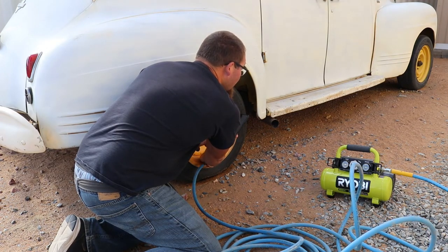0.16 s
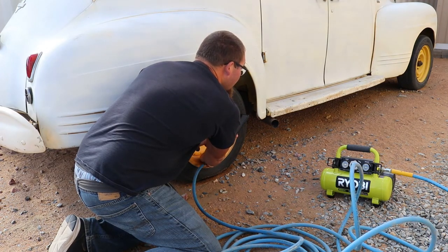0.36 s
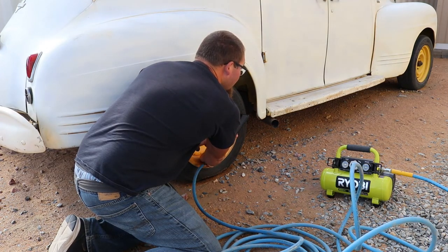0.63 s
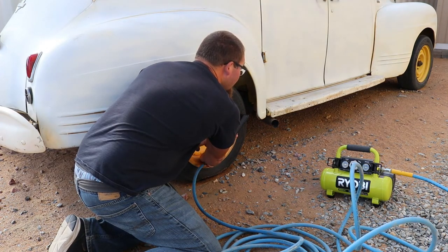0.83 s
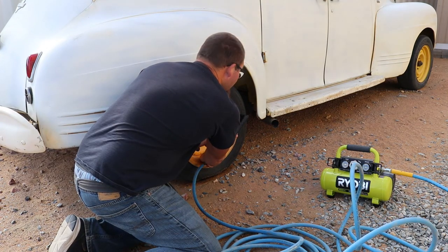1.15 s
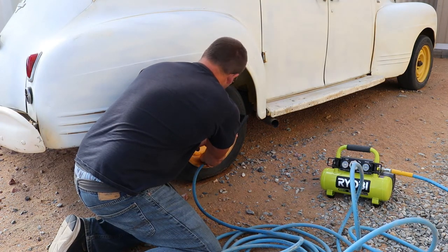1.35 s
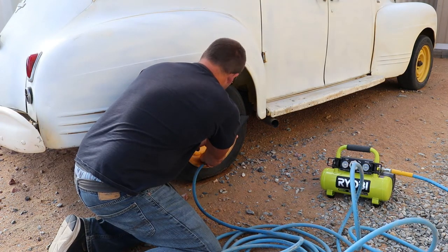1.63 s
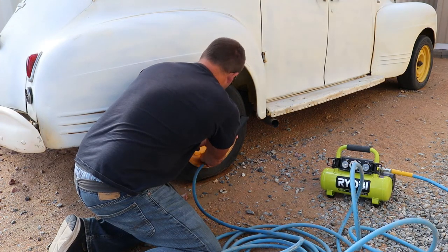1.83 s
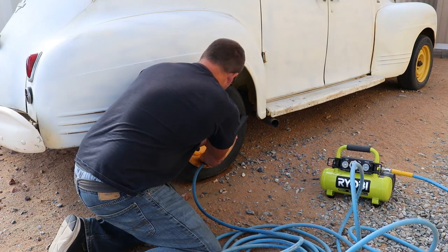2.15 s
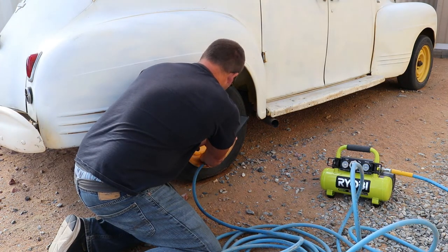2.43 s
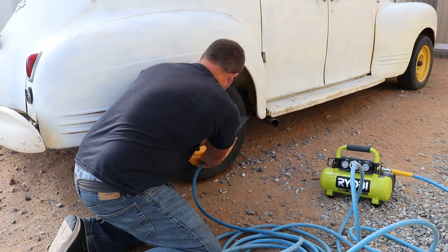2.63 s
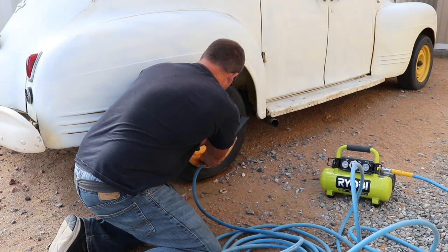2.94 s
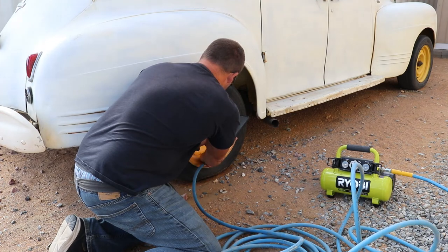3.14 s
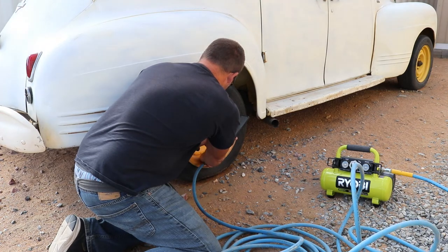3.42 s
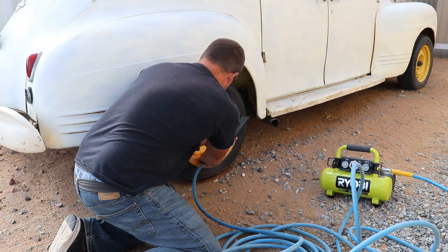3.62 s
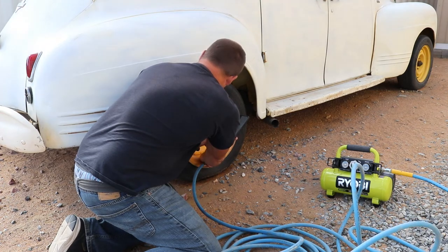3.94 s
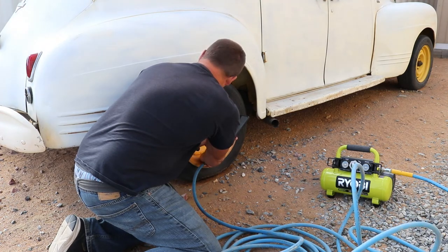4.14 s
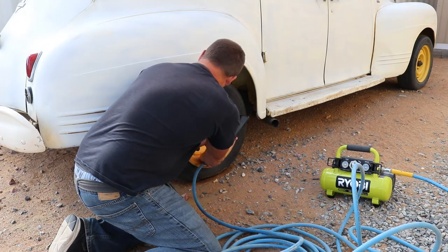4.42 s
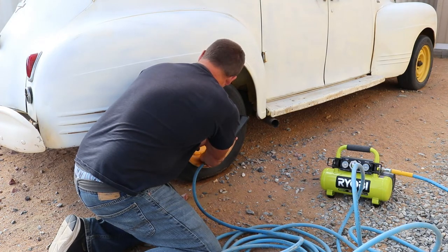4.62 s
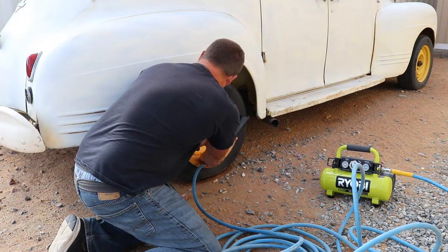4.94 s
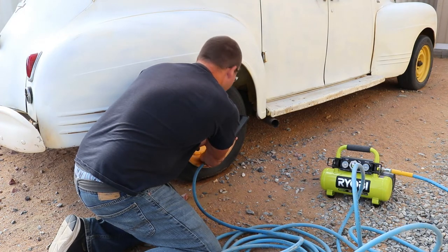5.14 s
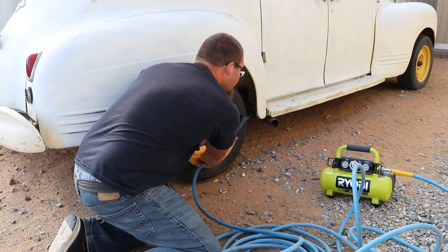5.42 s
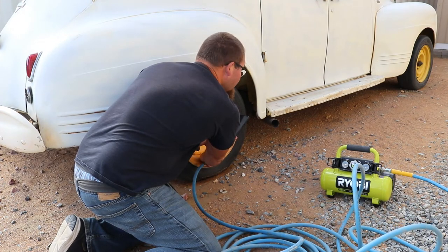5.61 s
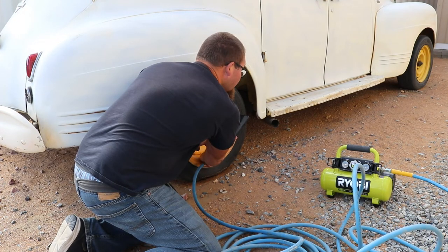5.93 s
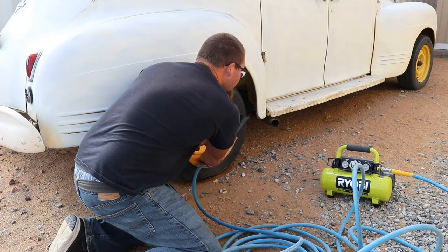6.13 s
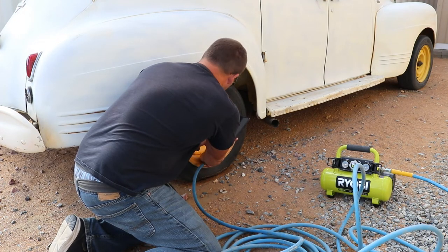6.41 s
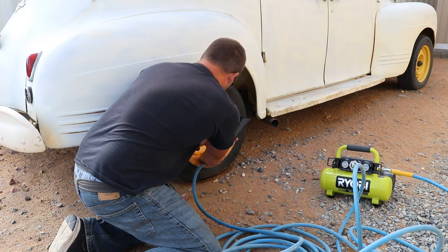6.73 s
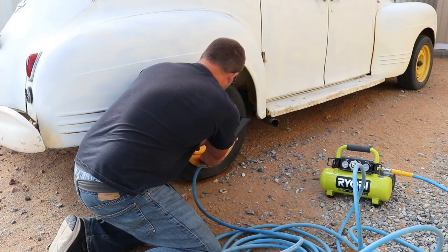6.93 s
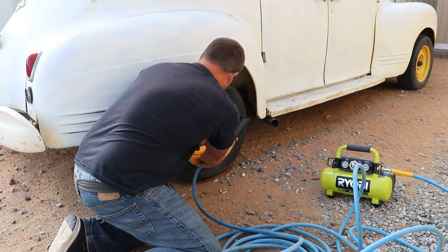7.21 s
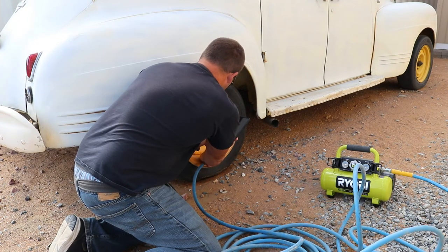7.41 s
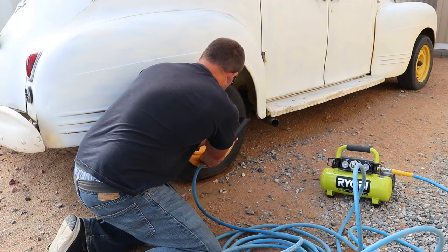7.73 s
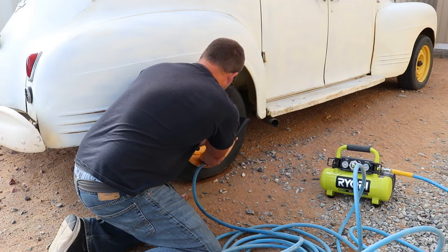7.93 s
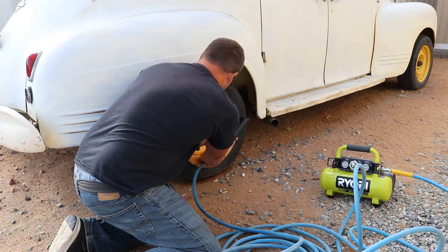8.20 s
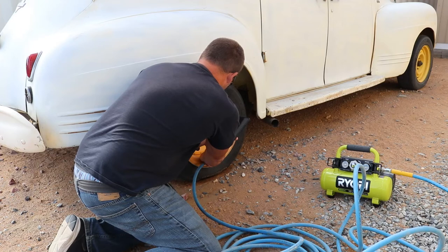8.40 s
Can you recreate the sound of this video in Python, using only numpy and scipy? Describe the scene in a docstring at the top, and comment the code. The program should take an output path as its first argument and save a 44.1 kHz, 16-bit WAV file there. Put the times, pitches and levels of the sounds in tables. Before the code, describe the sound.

A small air compressor runs steadily outdoors, with a buzzing motor drone, fine metallic rattle and soft air hiss.

```python
"""Outdoors on gravel, a couple of metres from the microphone, a small battery piston compressor pumps steadily.
Every shaft turn repeats one stroke: a gulp that rings housing and head, valve knocks on the metal,
a fine clatter. Behind the piston, ball bearings beat against the turn and air hisses through the same
body. A faint mains hum lies underneath."""
import sys
import numpy as np
from scipy import signal
from scipy.fft import rfft, irfft, next_fast_len
from scipy.io import wavfile
from scipy.ndimage import uniform_filter1d, map_coordinates

SR = 44100
rng = np.random.default_rng(int(sys.argv[2]) if len(sys.argv) > 2 else 0)


def master_out(mix):
    """Clip the mix to full scale and print it as 16-bit PCM to the path in sys.argv[1]."""
    frames = np.transpose(np.atleast_2d(mix))
    ceiling = np.clip(frames, -1, 1)
    pcm = np.round(ceiling * 32767).astype(np.int16)
    wavfile.write(sys.argv[1], SR, pcm)


N = 377937

# Shaft speed, creeping up: time_s, speed_hz
SHAFT_SPEED = [(0, 82.455), (2, 82.5), (4, 82.565), (6, 82.655), (8.57, 82.765)]
# Overtones 1, 2, 3 .. of the turn, sliding as the back pressure changes: start_db, end_db
GULP_LEVELS = [(-42.5, -43.0), (-40.0, -40.5), (-47.0, -46.5), (-27.0, -25.0), (-18.0, -16.5),
               (-23.0, -26.0), (-29.5, -30.5), (-25.0, -24.0), (-33.0, -28.5), (-37.0, -33.5),
               (-33.0, -34.0), (-40.0, -43.5), (-45.5, -42.5), (-29.0, -33.0), (-32.5, -36.0),
               (-44.5, -41.5)]
# Mode clusters delay the gulp, a notch (count -1) turns it over: centre_hz, width_hz, mode_count
HOUSING_MODES = [(486, 177, 5), (823, 20, -1), (1143, 232, 5)]
# Buzz above the gulp, per overtone: pitch_hz, level_db
BUZZ_SPECTRUM = [(1400, -54), (1800, -52), (2400, -56.5), (3100, -55.5), (3750, -68.5), (5100, -61.5),
                 (6300, -66), (6700, -77.5), (7250, -77), (7800, -66), (8500, -85), (9400, -74),
                 (10100, -84.5)]
# Overtones that land on a sharp mode of the metal and sing out: overtone, start_db, end_db
SINGING_OVERTONES = [(20, -46, -48.5), (23, -46, -55.5), (24, -46.5, -50), (27, -55.5, -49),
                     (28, -50.5, -41), (31, -49.5, -47.5), (35, -47.5, -53), (36, -46.5, -49),
                     (38, -49.5, -52.5), (51, -57.5, -59.5), (59, -65.5, -55.5), (62, -52, -55.5),
                     (77, -58, -52), (78, -59, -58), (95, -64, -62.5), (115, -66, -68.5)]
# Valve knocks, levels before trim: pitch_hz, width_hz, angle_turns, repeating_db, scattered_db
VALVE_KNOCKS = [(1560, 150, .4, -50, -66), (1950, 200, .28, -50, -64), (2300, 130, .12, -46, -62),
                (2620, 200, .95, -54, -68), (3000, 120, .68, -52, -66), (5120, 60, .2, -63, -62),
                (6370, 120, .3, -53, -60), (7350, 60, .88, -68, -78), (7700, 120, .9, -70, -75),
                (7830, 300, .25, -59, -66), (9510, 120, .23, -62, -70)]
# Settled clatter, per overtone: pitch_hz, level_db
CLATTER_SPECTRUM = [(300, -86.5), (900, -70), (1300, -59), (3000, -60), (3500, -76), (4600, -72.5),
                    (6300, -72.5), (6600, -83.5), (8000, -79.5), (10000, -90), (10300, -92), (12000, -93),
                    (15500, -102)]
# Bearing cages, levels before trim: turns_per_shaft_turn, level_db
BEARING_CAGES = [(.383, -57), (.414, -57), (.4375, -57)]
# Resonances of the bearing races: centre_hz, width_hz, relative_db
RACE_MODES = [(1070, 100, 1), (1175, 100, 2), (1447, 97, 7.5), (2004, 150, 2.5), (2277, 260, 0),
              (2550, 220, -8.5)]
# Air hiss before the body colours it: frequency_hz, density_db (per Hz)
AIR_SPECTRUM = [(30, -93), (80, -85), (270, -83.5), (330, -71.5), (800, -72.5), (1350, -80), (2600, -84),
                (3700, -86.5), (5000, -90), (6400, -89.5), (6700, -99), (9500, -102), (10200, -108),
                (15500, -112)]
# Body resonances that colour the hiss: centre_hz, width_hz, lift_db
BODY_MODES = [(453, 86, 6.5), (1155, 260, 8.5), (1430, 80, 8), (1840, 55, -6), (1980, 240, 4),
              (2280, 150, 4), (3040, 260, 5), (4600, 350, 10.5)]

POINTS, FRAMES = 4096, 70  # samples in a turn, snapshots of that turn across the scene
STROKE_OVERTONES, ALL_OVERTONES = 122, 188


def piston(hz, turns, restless_db=-6):
    """Main source: the stroke, topped by knocks and clatter; restless clatter sways the weak overtones."""
    repeating, scattered = valve_knocks(hz, turns)
    settled = repeating + clatter(hz, hold_frames=120)
    above_stroke = np.arange(len(hz)) >= STROKE_OVERTONES
    overtones = stroke(hz, settled[0]) + above_stroke * settled
    restless = undb(restless_db) * clatter(hz, hold_frames=12)
    return play_turns(overtones + restless, turns) + scattered


def stroke(hz, rattle, sway_db=0.2, angle_turns=-.096, lead_cycles=.104, gulp_top_hz=1360):
    """Low overtones keep the timing of one gulp; the upper ones take theirs from knocks and clatter."""
    order, pitch_hz = np.arange(1, STROKE_OVERTONES + 1), hz[:STROKE_OVERTONES]
    start_db, end_db = stroke_levels(pitch_hz)
    db = start_db + (end_db - start_db) * np.linspace(0, 1, FRAMES)[:, None]
    db += sway_db * drift(len(order), 5)
    housing_phase = sum(count * np.angle(mode(pitch_hz, f, w)) for f, w, count in HOUSING_MODES)
    gulp_phase = 2 * np.pi * (lead_cycles - angle_turns * order) + housing_phase
    phase = np.where(pitch_hz > gulp_top_hz, np.angle(rattle[:len(order)]), gulp_phase)
    return np.pad(undb(db) * np.exp(1j * phase), ((0, 0), (0, len(hz) - len(order))))


def stroke_levels(hz, uneven_db=2, slide_db=2.5):
    """Start and end dB of each overtone: the gulp below, an uneven buzz above, a few that sing."""
    uneven, slide = rng.standard_normal((len(hz), 2)).T
    buzz_db = spectrum_db(BUZZ_SPECTRUM, hz) + uneven_db * uneven
    ends = buzz_db[:, None] + np.outer(slide_db * slide, [-.5, .5])
    ends[:len(GULP_LEVELS)] = GULP_LEVELS
    for overtone, start_db, end_db in SINGING_OVERTONES:
        ends[overtone - 1] = start_db, end_db
    return ends.T


def valve_knocks(hz, turns, puff_decay_turns=0.17, puff_trim_db=-5.5):
    """Each valve blow rings its mode alike every turn; a puff of noise after it makes the turns differ."""
    order = np.arange(1, len(hz) + 1)
    repeating, scattered = 0, 0  # overtones, waveform
    for pitch_hz, width_hz, angle, repeating_db, scattered_db in VALVE_KNOCKS:
        ring = mode(hz, pitch_hz, width_hz) ** 2 * np.exp(-2j * np.pi * order * angle)
        repeating += level(ring, repeating_db) / np.sqrt(len(hz))
        puff = np.exp(-((turns - angle) % 1) / puff_decay_turns) * rng.standard_normal(N)
        band = signal.iirpeak(pitch_hz, pitch_hz / (2 * width_hz), SR)
        rung_puff = signal.lfilter(*band, signal.lfilter(*band, puff))
        scattered += level(rung_puff, scattered_db + puff_trim_db)
    return repeating, scattered


def clatter(hz, hold_frames):
    """A fine random rattle that comes round every turn and gradually renews itself."""
    pattern = drift(len(hz), hold_frames) + 1j * drift(len(hz), hold_frames)
    return pattern / np.sqrt(2) * undb(spectrum_db(CLATTER_SPECTRUM, hz))


def bearings(hz, turns, trim_db=2.5):
    """The roll of the balls in their races swells and fades as each cage goes round."""
    colour = sum(undb(db) * mode(hz, f, w) ** 2 for f, w, db in RACE_MODES)
    out = 0
    for ratio, db in BEARING_CAGES:
        roll = colour * (drift(len(hz), 40) + 1j * drift(len(hz), 45))
        beat = np.cos(2 * np.pi * ratio * turns)
        out += level(play_turns(roll, turns) * beat, db + trim_db)
    return out


def air_hiss(turns, pulse_db=0.4, delivery_turns=0.32):
    """Rushing air coloured by the body, a little louder on the delivery stroke."""
    size = next_fast_len(N)
    hz = np.arange(size // 2 + 1) * SR / size
    body_db = sum(lift * np.abs(mode(hz, f, w)) ** 2 for f, w, lift in BODY_MODES)
    colour = undb(spectrum_db(AIR_SPECTRUM, hz) + body_db) * np.sqrt(SR / 2)
    rush = irfft(rfft(rng.standard_normal(size)) * colour, size)[:N]
    return rush * undb(pulse_db * np.cos(2 * np.pi * (turns - delivery_turns)))


def mains_hum(t, pitch_hz=60.5, level_db=-69.5):
    """One faint mains tone, far beneath the machine."""
    return level(np.sin(2 * np.pi * pitch_hz * t), level_db)


def play_turns(overtones, turns):
    """Snapshots of one turn (complex rms per overtone), read at the crank angle and blended in time."""
    spectrum = np.pad(overtones, ((0, 0), (1, POINTS // 2 - overtones.shape[1])))
    wave = irfft(spectrum, POINTS, axis=1) * POINTS / np.sqrt(2)
    looped = np.hstack([wave, wave[:, :1]])
    return map_coordinates(looped, [np.linspace(0, FRAMES - 1, N), turns % 1 * POINTS], order=1)


def drift(count, hold_frames):
    """Slow random wander over the snapshots, one column per overtone; spread 1."""
    noise = rng.standard_normal((FRAMES + hold_frames, count))
    return uniform_filter1d(noise, hold_frames, axis=0)[:FRAMES] * np.sqrt(hold_frames)


def mode(hz, centre_hz, width_hz):
    """Complex response of one damped mode, 1 at its centre."""
    return 1 / (1 + 2j * (hz - centre_hz) / width_hz)


def spectrum_db(table, hz):
    """Level from a (Hz, dB) table, interpolated in log frequency."""
    table_hz, table_db = np.transpose(table)
    return np.interp(np.log(np.maximum(hz, 1)), np.log(table_hz), table_db)


def level(x, db):
    """Scale to an rms level."""
    return x * undb(db) / np.sqrt(np.mean(np.abs(x) ** 2))


def undb(db):
    """Gain of a level in dB."""
    return 10 ** (np.asarray(db) / 20)


def scene(start_turns=.012):
    """At the microphone, in mono: piston, bearings and air follow the one shaft, over the hum."""
    t = np.arange(N) / SR
    speed_hz = np.interp(t, *np.transpose(SHAFT_SPEED))
    turns = start_turns + np.cumsum(speed_hz) / SR
    hz = np.arange(1, ALL_OVERTONES + 1) * speed_hz.mean()
    return (piston(hz, turns) + bearings(hz, turns) + air_hiss(turns) + mains_hum(t))[None]


def record(dry, gain_db=0.18, top_hz=15650):
    """The recorder: a set microphone gain and a steep treble cut."""
    lowpass = signal.ellip(12, .2, 70, top_hz, fs=SR, output="sos")
    return signal.sosfilt(lowpass, dry * undb(gain_db))


dry = scene()
out = record(dry)
master_out(out)
```